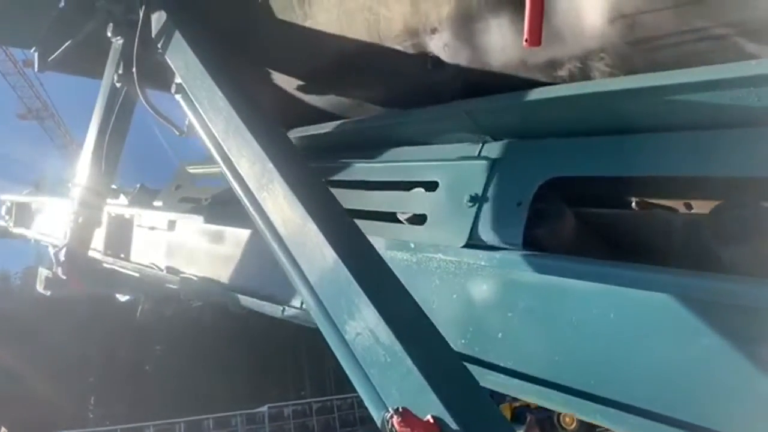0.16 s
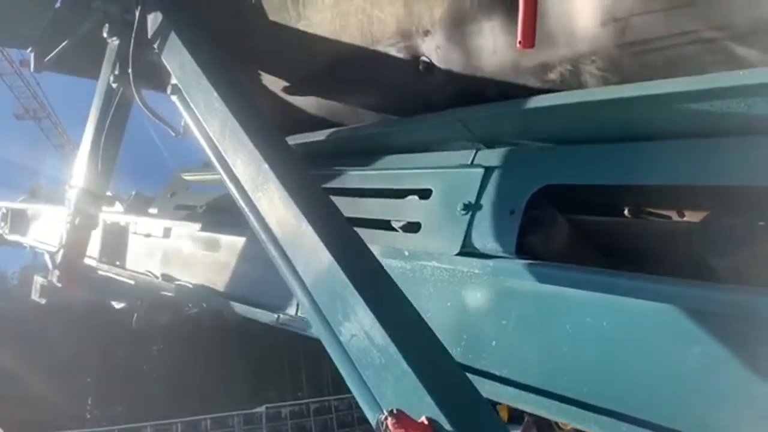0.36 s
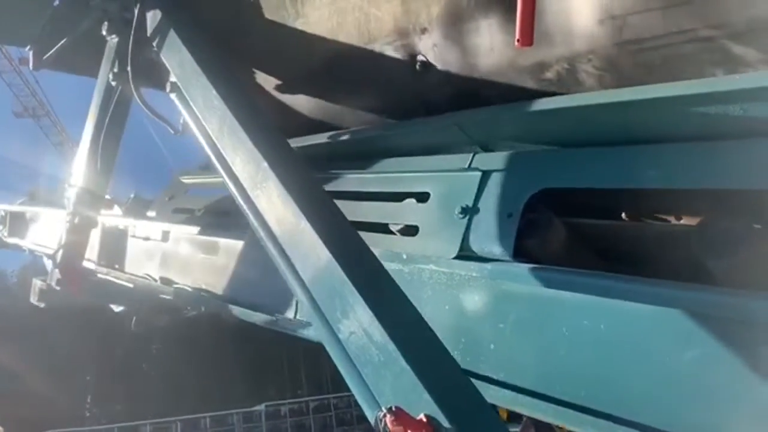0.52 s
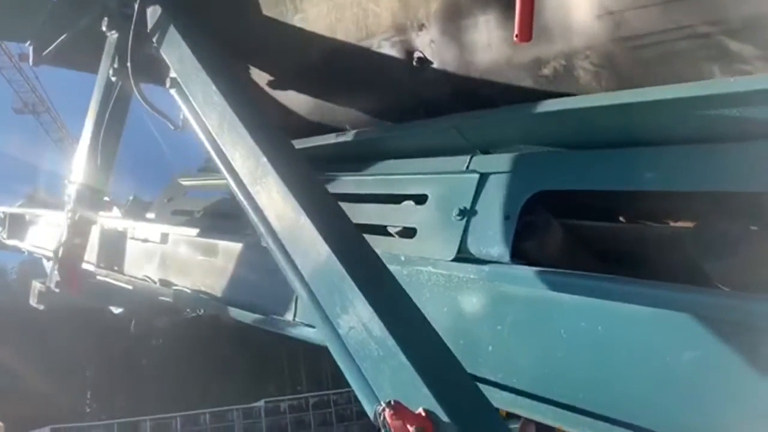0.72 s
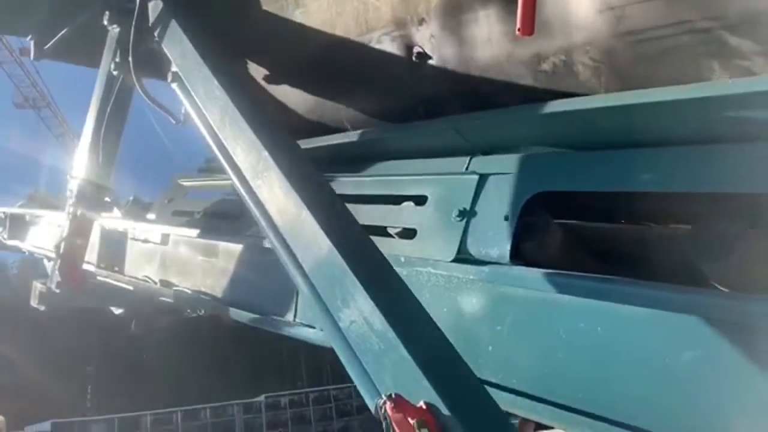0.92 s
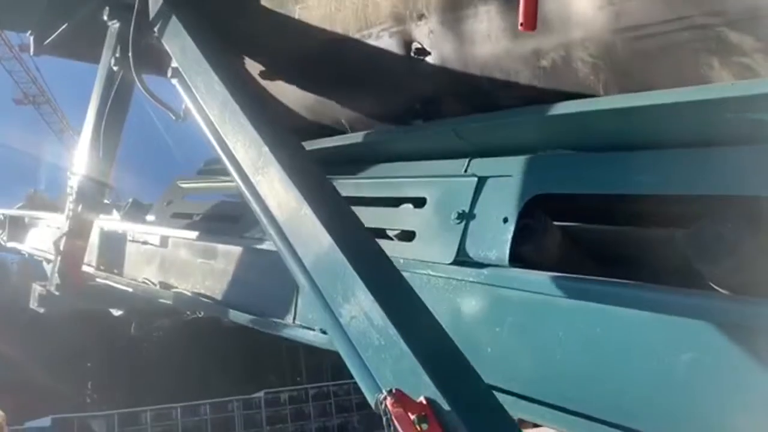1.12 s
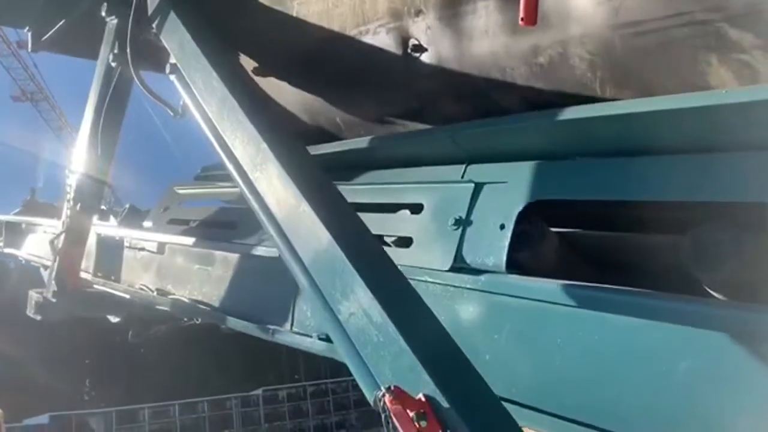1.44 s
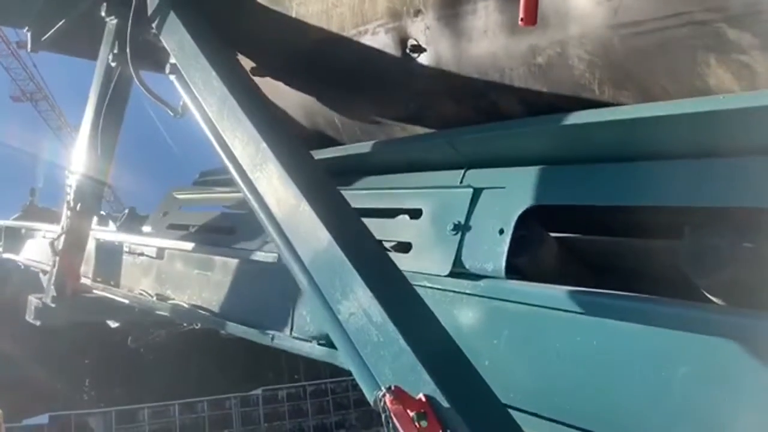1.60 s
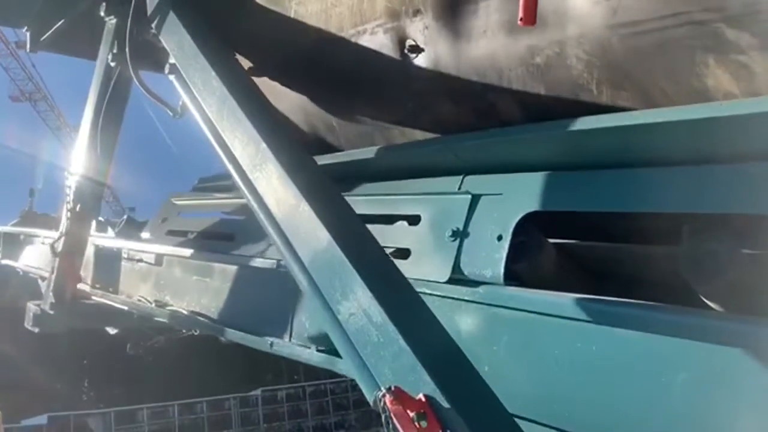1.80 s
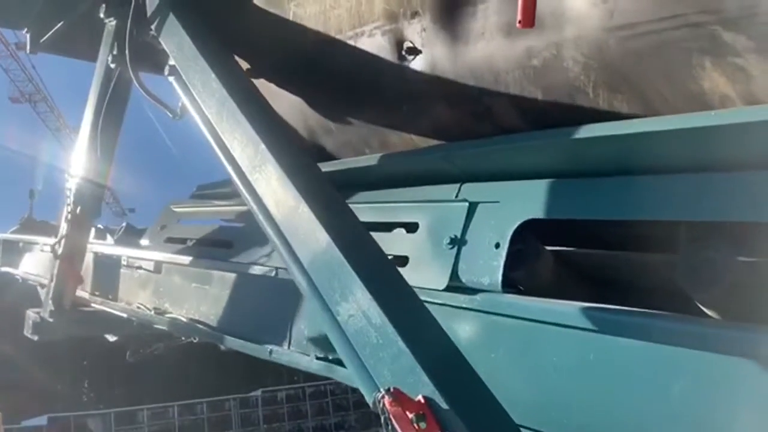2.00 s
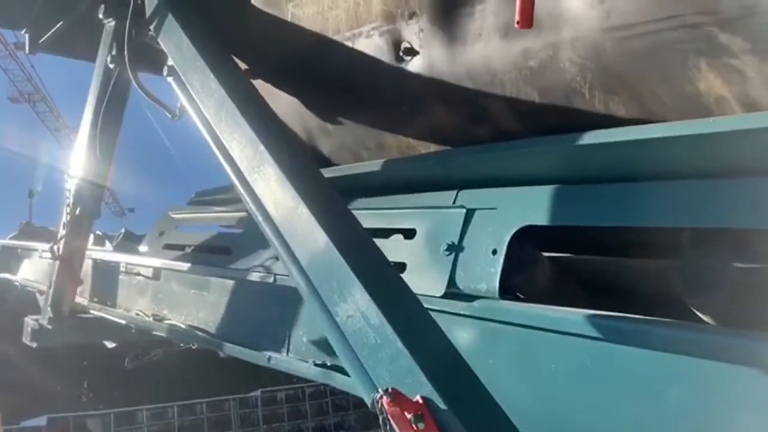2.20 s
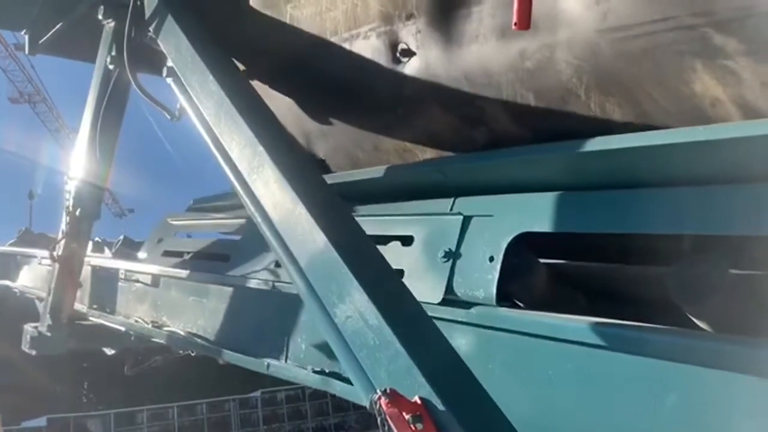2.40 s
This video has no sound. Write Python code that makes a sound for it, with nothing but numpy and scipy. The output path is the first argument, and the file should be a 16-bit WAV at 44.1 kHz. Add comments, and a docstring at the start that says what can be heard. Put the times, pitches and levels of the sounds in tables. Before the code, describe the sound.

A big diesel screening machine runs steadily outdoors, heard close in stereo: low throbbing drone, rough mechanical clatter, thin gear whine, loose rattles and tiny stone pings, then one short steel clank near the end.

```python
"""Outdoors, close beside a diesel screening machine that runs steadily, heard by a two-port microphone.
The exhaust drones in tones on the engine cycle; block clatter is noise that partly repeats each cycle.
Gear and pump whine as wavering tones, and a panel hums in one narrow, swelling resonance.
Loose parts rattle in short bursts of noise; stones ping the modes of the steel deck, which clanks once.
The treble jumps up around the clank, eases and rises again."""
import sys
import numpy as np
from scipy import signal
from scipy.io import wavfile
from scipy.ndimage import uniform_filter1d

SR = 44100
rng = np.random.default_rng(int(sys.argv[2]) if len(sys.argv) > 2 else 0)


def bounce(signal):
    """Save signal as a 16-bit WAV file at the path given by the first command-line argument."""
    frames = np.transpose(np.atleast_2d(signal))
    limited = np.clip(frames, -1, 1)
    pcm = np.round(limited * 32767).astype(np.int16)
    wavfile.write(sys.argv[1], SR, pcm)


N = 112455  # length in samples

CYCLE_HZ = 19.9012  # engine cycles per second; four firings in each


def amp(db):
    """Amplitude factor of a level in dB."""
    return 10 ** (np.asarray(db) / 20)


def evened(x):
    """Signal scaled to rms 1."""
    return x / np.sqrt(np.mean(abs(x) ** 2) + 1e-20)


def read(table, hz, col=1):
    """Column of a table along log frequency."""
    log_hz = np.log(np.array(table)[:, 0] + 1)
    return np.interp(np.log(hz + 1), log_hz, np.array(table)[:, col])


def curve(table):
    """Columns of a table along time, one row each."""
    seconds, *columns = np.transpose(table)
    t = np.arange(N) / SR
    return np.array([np.interp(t, seconds, column) for column in columns])


def drift(width_hz):
    """Slow complex chance of rms 1: white noise through two equal one-pole lowpasses."""
    pole = np.exp(-2 * np.pi * width_hz / SR)
    noise = rng.standard_normal(N + SR) + 1j * rng.standard_normal(N + SR)
    slow = signal.lfilter([1], np.convolve([1, -pole], [1, -pole]), noise)
    return evened(slow[SR:])  # the first second lets the filter settle


# How alike the two microphone ports hear the machine.
# Each row: frequency in Hz, likeness 0-1, lead of the left port in rad.
PORT_BOND = [(30, .93, 0), (70, .995, 0), (200, .93, -.3), (250, .9, -.7), (290, .6, -2), (380, .85, -1),
             (520, .77, -1.7), (640, .35, 2.9), (800, .35, 1), (1000, .4, -1.6), (1170, .77, -2),
             (1500, .6, -2.1), (1850, .25, -.4), (2200, .3, -2.9), (3300, .5, 3), (4300, .35, 1),
             (5400, .35, -2.9), (6600, .67, 0), (7300, .2, .6), (8400, .25, -2.3), (9600, .75, -3),
             (12500, .6, 0)]


def bond(hz):
    """Likeness of the ports as a turned arrow: length is likeness, angle is the left lead."""
    f, likeness, lead = np.transpose(PORT_BOND)
    arrow = likeness * np.exp(1j * lead)
    return read(np.c_[f, arrow.real], hz) + 1j * read(np.c_[f, arrow.imag], hz)


# Exhaust and block tones, before waver and the level curves below.
# Each row: multiple of the engine cycle, left level in dB, right level in dB.
EXHAUST_TONES = [(4, -19, -19), (8, -26.5, -27.7), (10, -32, -34), (11, -40, -44), (12, -43, -45),
                 (20, -42, -34), (23, -43, -39), (24, -43, -37), (25, -44, -40), (26, -44, -40),
                 (30, -44, -40), (40, -50, -43), (44, -49, -45), (52, -57, -45), (59, -49, -43),
                 (120, -52, -60), (126, -51, -59), (131, -51, -59), (144, -52, -62)]
# Swelling and sinking of the 20th multiple, in the body's resonance.
# Each row: time in seconds, level change in dB.
BODY_BOOM = [(0, 0), (.45, 0), (1.15, -8), (1.35, 3), (1.6, -5), (1.8, 1), (2.05, -3), (2.3, 4)]
BOOM_ORDER = 20
# Level of the whole drone. Each row: time in seconds, level change in dB.
DRONE_LEVEL = [(0, 1), (.12, -0.5), (.74, -0.5), (.79, -2), (.84, 0.5), (1.61, -0.25), (2.2, 0),
               (2.55, -0.6)]
SKEW_RAD = -2.4  # phase step from each overtone of the firing rate to the next
WAVER_DB, WAVER_HZ = 1.2, 8  # depth factor at the 16th multiple; corner of the waver's filter


def exhaust():
    """Tones on multiples of the engine cycle; those off the firing rate start at chance, all waver."""
    turn = 2 * np.pi * CYCLE_HZ * np.arange(N) / SR
    out = np.zeros((2, N))
    for order, left_db, right_db in EXHAUST_TONES:
        order = round(order)
        chance = 2 * np.pi * rng.random()
        sway = drift(WAVER_HZ).real
        on_firing = order % 4 == 0
        start = SKEW_RAD * (order // 4 - 1) if on_firing else chance
        lag = np.array([[0], [np.angle(bond(order * CYCLE_HZ))]])
        # higher multiples waver more, up to a limit
        waver_db = WAVER_DB * min(order / 16, 1.5) * sway
        level = amp(np.c_[[left_db, right_db]] + waver_db)
        if order == BOOM_ORDER:
            level = level * amp(curve(BODY_BOOM))
        out += np.sqrt(2) * level * np.cos(order * turn + start - lag)
    return out * amp(curve(DRONE_LEVEL))


# Machine roar at the two ports, before the treble curve and flicker.
# Each row: frequency in Hz, left level in dB per Hz, right level in dB per Hz.
ROAR_AT_PORTS = [(30, -64, -63), (60, -50.5, -50), (109, -55, -55), (180, -53, -52.5), (231, -52.5, -59.5),
                 (310, -54.5, -56.5), (366, -55, -50), (444, -58.5, -51), (534, -54, -54.5),
                 (606, -65.5, -56), (714, -60.5, -54.5), (982, -67, -58.5), (1200, -53.5, -55),
                 (1270, -63.5, -59), (1483, -52.5, -57.5), (1566, -61.5, -56), (1750, -62.5, -60.5),
                 (2370, -66, -65.5), (2880, -64, -70.5), (3120, -73, -72), (3380, -66.5, -72),
                 (4170, -71.5, -77), (4840, -72, -72.5), (4860, -77, -76.5), (6000, -77.5, -77),
                 (6480, -74.5, -74), (7230, -80, -77.5), (8340, -86, -81.5), (9560, -88, -88.5),
                 (9860, -107.5, -109), (13500, -103, -104)]
# How much of the roar follows the engine cycle. Each row: frequency in Hz, share of power 0-1.
CYCLE_SHARE = [(150, 0.22), (500, 0.46), (1500, 0.18), (2800, 0.5), (4500, 0.17)]
# Level of the treble, for the roar and the stone pings. Each row: time in seconds, level change in dB.
TREBLE_LEVEL = [(0, -2), (.3, 0), (.85, -1.4), (1.25, 0), (1.45, -2.16), (2.12, -0.5), (2.16, 3), (2.3, 1),
                (2.55, 3)]
TREBLE_FROM_HZ = 1380  # half of the treble's dB change is reached about here
REPEAT = 0.892  # share of each cycle's clatter carried into the next
PATCH_DB = 2  # rms patchiness far up in the treble
FLICKER_DB, FLICKER_HZ = 1.12, 24  # depth factor on the random flicker; corner of its filter
FRAME, OVERLAP = 2048, 1792  # spectrogram frame and overlap, samples


def roar():
    """Clatter that repeats each cycle plus free noise, patchy, coloured and spread over the ports."""
    cycle = round(SR / CYCLE_HZ)
    fresh = rng.standard_normal((2, N // cycle + 30, cycle))
    # each cycle keeps most of the one before
    repeated = signal.lfilter([1], [1, -np.clip(REPEAT, 0, .97)], fresh, axis=1)
    locked = evened(repeated.reshape(2, -1)[:, -N - 4096:])
    free = rng.standard_normal(locked.shape)
    hz, t, locked_bins = signal.stft(locked, SR, nperseg=FRAME, noverlap=OVERLAP)
    free_bins = signal.stft(free, SR, nperseg=FRAME, noverlap=OVERLAP)[2]
    share = np.clip(read(CYCLE_SHARE, hz), 0, 1)[:, None]
    first, second = np.sqrt(share) * locked_bins + np.sqrt(1 - share) * free_bins

    grain = uniform_filter1d(rng.standard_normal(first.shape), size=20, axis=0)
    patch = evened(uniform_filter1d(grain, size=12, axis=1))
    high = 1 / (1 + (TREBLE_FROM_HZ / (hz[:, None] + 1)) ** 2)
    treble_db = np.interp(t - FRAME / SR, *np.transpose(TREBLE_LEVEL))
    field_db = high * (PATCH_DB * patch + treble_db)

    # the right port hears part of the left port's noise, turned, plus noise of its own
    tie = bond(hz)[:, None]
    left = first * amp(read(ROAR_AT_PORTS, hz))[:, None]
    right = tie.conj() * first + np.sqrt(1 - abs(tie) ** 2) * second
    right = right * amp(read(ROAR_AT_PORTS, hz, col=2))[:, None]
    bins = np.array([left, right]) * amp(field_db)
    out = np.sqrt(SR / 2) * signal.istft(bins, SR, nperseg=FRAME, noverlap=OVERLAP)[1]
    return out[:, FRAME:FRAME + N] * amp(FLICKER_DB * drift(FLICKER_HZ).real)


# Gear whine. Each row: time in seconds, left level in dB, right level in dB, left lead in rad.
GEAR_WHINE = [(0, -32, -32, .3), (.25, -30.5, -30.5, .7), (.65, -32, -33, 1.7), (1, -35, -38, 1.3),
              (1.35, -35, -41, 2.8), (1.7, -32.5, -44, 3.1), (2.1, -31.5, -43, 5), (2.55, -31, -33, 5.6)]
GEAR_ORDER = 88  # multiple of the engine cycle
# Pump overtones. Each row: multiple of the pump tone, left level in dB, right level in dB, left lead in rad.
PUMP_TONES = [(6, -36.5, -39, -2), (7, -35.5, -46.5, -0.93)]
PUMP_HZ, PUMP_SAG_HZ_PER_S = 248.15, .22  # pitch at the start and its steady fall
WHINE_FUZZ_HZ, WHINE_ROUGH = 7, .16  # corner of the waver's filter; its rms beside a tone of 1


def whine():
    """A gear tone locked to the engine and two overtones of a pump, each wavering a little."""
    t = np.arange(N) / SR
    pump_turns = (PUMP_HZ - PUMP_SAG_HZ_PER_S * t / 2) * t
    tones = [(GEAR_ORDER * CYCLE_HZ * t, *curve(GEAR_WHINE))]
    tones += [(round(k) * pump_turns, *rest) for k, *rest in PUMP_TONES]
    out = np.zeros((2, N))
    for turns, left_db, right_db, lead in tones:
        for side, (db, rad) in enumerate([(left_db, lead), (right_db, 0)]):
            waver = evened(1 + WHINE_ROUGH * drift(WHINE_FUZZ_HZ))
            tone = np.exp(1j * (2 * np.pi * turns + rad))
            out[side] += np.sqrt(2) * amp(db) * (waver * tone).real
    return out


# Swelling of the panel hum, before it is set between the ports.
# Each row: time in seconds, level in dB.
PANEL_SWELL = [(0, -38), (.35, -35), (.6, -42), (.69, -29), (.78, -42), (1.08, -29.5), (1.25, -42),
               (1.5, -42), (1.56, -32), (1.64, -42), (2.12, -41), (2.24, -25.5), (2.37, -41), (2.55, -35)]
PANEL_HZ, PANEL_WIDTH_HZ = 373, 5  # mean pitch; factor on its random wander
PANEL_JITTER_HZ = 16  # corner of the wander's filter
PANEL_PAN_DB, PANEL_LEAD_RAD = -2, -.8  # left level change (right gets the opposite); left lead


def panel():
    """A shaken panel: one narrow resonance of unsteady pitch that swells and sinks."""
    pitch_hz = PANEL_HZ + PANEL_WIDTH_HZ * drift(PANEL_JITTER_HZ).real
    ring = np.exp(2j * np.pi * np.cumsum(pitch_hz) / SR)
    sides = amp([[PANEL_PAN_DB], [-PANEL_PAN_DB]]) * np.exp([[1j * PANEL_LEAD_RAD], [0]])
    return np.sqrt(2) * amp(curve(PANEL_SWELL)) * (ring * sides).real


# Loud rattles of loose parts.
# Each row: start in seconds, level in dB before the burst's shape and noise.
LOUD_RATTLES = [(0.223, -28.5), (0.9664, -28.5), (1.1303, -31), (1.1536, -31), (1.299, -30), (1.7739, -32),
                (2.2633, -34), (2.479, -29)]
RATTLE_HZ, RATTLE_WIDTH_HZ = 3600, 1500  # centre and nominal width of the resonance
RATTLE_T60 = 0.11  # seconds to die by 60 dB
SMALL_PER_S, SMALL_DB = 19, -46.5  # mean rate and lowest level of the small rattles


def rattles():
    """Loose parts: short dying bursts in one broad resonance, a few loud and many small."""
    small_db = SMALL_DB + 1.2 * np.minimum(rng.exponential(1, N), 2)
    hits = amp(small_db) * (rng.random(N) < SMALL_PER_S / SR)
    for s, db in LOUD_RATTLES:
        hits[round(s * SR)] = amp(db)
    t = np.arange(SR // 4) / SR
    burst = np.minimum(t / 0.0021, 1) * amp(-60 * t / RATTLE_T60)
    shape = signal.oaconvolve(hits, burst)[:N]
    tone = np.exp(2j * np.pi * RATTLE_HZ * np.arange(N) / SR)
    return np.array([shape * (tone * drift(RATTLE_WIDTH_HZ / 2)).real for side in range(2)])


# Modes of the steel deck. Each entry: frequency in Hz.
DECK_HZ = [1950, 2590, 3303, 3465, 3970, 4580, 5990, 6600]
# Ringing of the same modes. Each row: level in dB relative to the strike, time to die by 60 dB in seconds.
DECK_RING = [(-2, .1), (-5, 0.053), (-12.5, 0.14), (-4.5, 0.13), (1.5, 0.21), (-1.5, 0.17), (2.5, 0.1),
             (-17, .08)]
CLANK_S, CLANK_DB = 2.147, -33.5  # time of the blow; its level before that of each mode
PINGS_PER_S, PING_DB = 30, -47.5  # stones per mode; lowest level before mode and treble curve
PING_SPREAD = .05  # pitch step between the three spots, as a share of the mode's pitch
DAMPED = 2  # pings die this many times faster than the blow


def clank():
    """One blow rings all modes of the steel deck; small stones ping single modes, louder with the treble."""
    t = np.arange(SR // 4) / SR
    rise = np.minimum(t / 0.0035, 1)
    blow = amp(CLANK_DB) * (np.arange(N) == round(CLANK_S * SR))
    out = np.zeros((2, N))
    for hz, (db, t60) in zip(DECK_HZ, DECK_RING):
        ping_db = PING_DB + 2.5 * np.minimum(rng.exponential(1, N), 3) + curve(TREBLE_LEVEL)[0]
        hits = amp(ping_db) * (rng.random(N) < PINGS_PER_S / SR)
        spot = rng.integers(-1, 2, N)  # each stone lands on one of three spots
        strikes = [(blow, hz, t60)]
        for k in (-1, 0, 1):
            strikes.append((hits * (spot == k), hz * (1 + PING_SPREAD * k), t60 / DAMPED))
        for train, f, ring_s in strikes:
            tone = np.sin(2 * np.pi * (f * t + rng.random((2, 1))))  # own phase at each port
            ring = amp(db - 60 * t / ring_s) * tone * rise
            out += signal.oaconvolve(train[None], ring, axes=1)[:, :N]
    return out


def scene():
    """All sources of the machine sound together at the two ports."""
    return exhaust() + roar() + whine() + panel() + rattles() + clank()


EDGE_HZ = 13400  # upper band limit of the recorder


def record(dry):
    """Band limit of the recorder as a steep lowpass, after a soft start and end."""
    from_edge = np.minimum(np.arange(N), np.arange(N)[::-1])
    soft = dry * np.minimum(from_edge / 200, 1)
    lowpass = signal.firwin(511, EDGE_HZ, window=("kaiser", 9), fs=SR)
    return signal.oaconvolve(soft, lowpass[None], "same", axes=1)


dry = scene()
out = record(dry)
bounce(out)
```